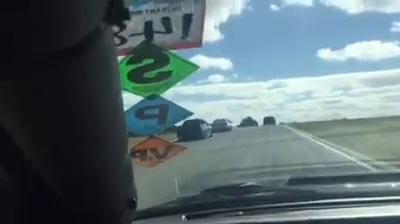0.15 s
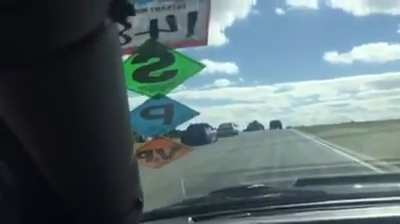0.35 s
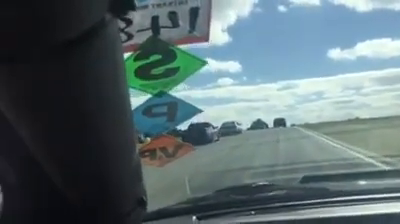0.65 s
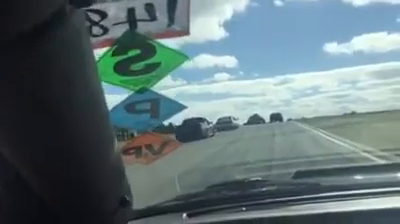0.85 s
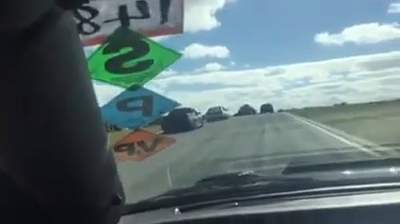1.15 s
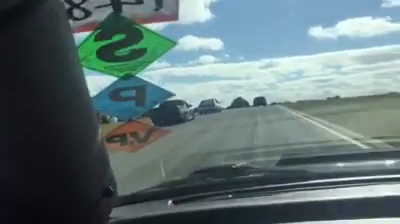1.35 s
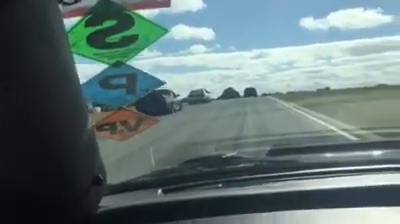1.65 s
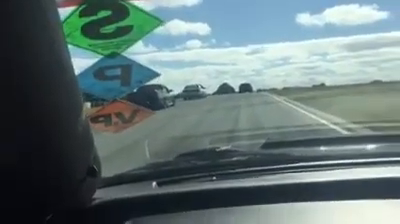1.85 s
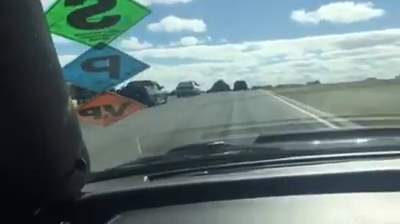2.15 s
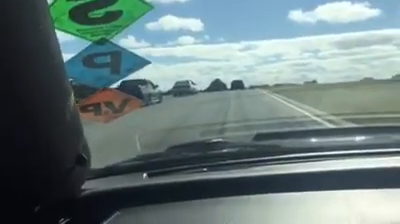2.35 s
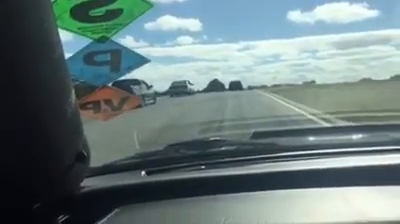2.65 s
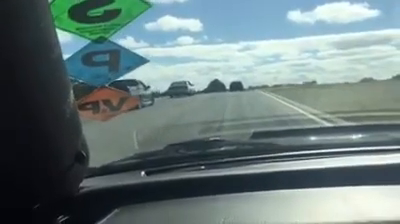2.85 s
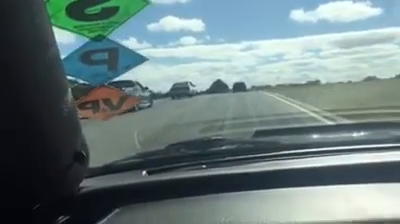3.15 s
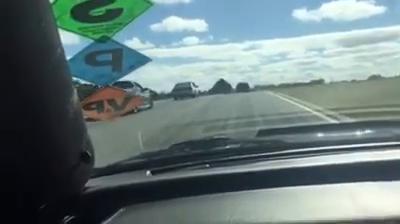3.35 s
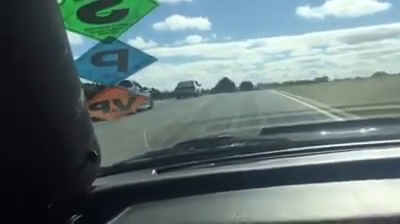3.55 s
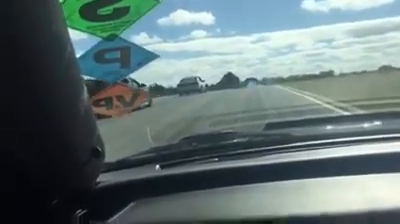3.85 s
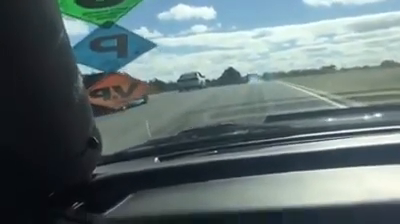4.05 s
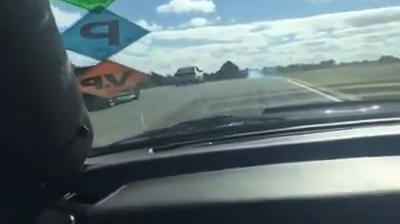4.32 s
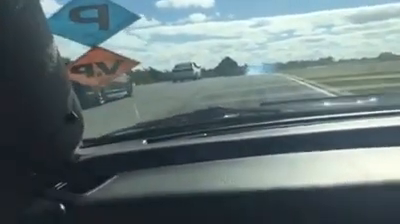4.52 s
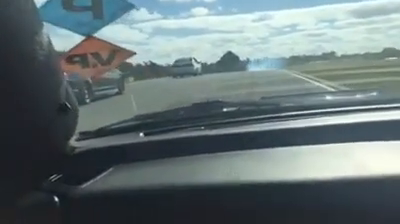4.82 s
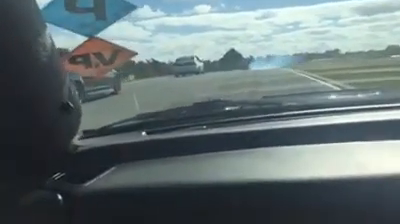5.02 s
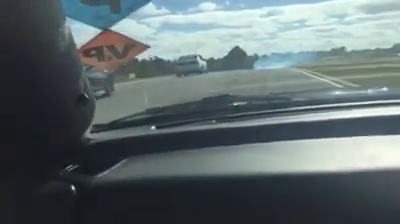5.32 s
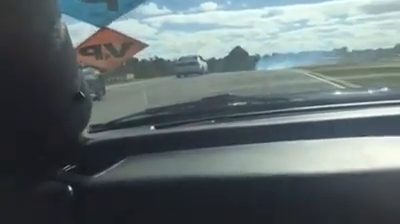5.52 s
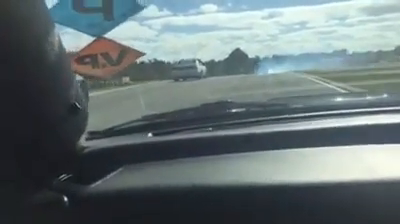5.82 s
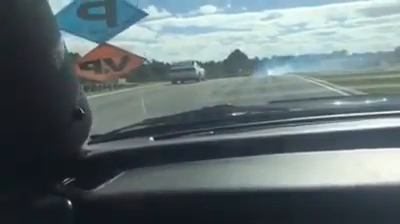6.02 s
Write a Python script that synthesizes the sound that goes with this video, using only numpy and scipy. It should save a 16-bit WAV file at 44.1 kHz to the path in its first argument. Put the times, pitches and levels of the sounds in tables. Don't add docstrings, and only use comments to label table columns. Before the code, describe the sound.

Heard from a phone inside a car at speed on a racing circuit: a loud, deep, uneven rotary engine drone, its revs creeping up slightly, over low tyre rumble and throbbing cabin air noise. Roar and tyre hiss of cars ahead come through the window and fade. Thin gear whines pass early; two small misfires hiccup around three and four seconds as a rival revs up and then lifts off.

```python
import sys
import numpy as np
from scipy import signal
from scipy.fft import rfft, irfft, next_fast_len
from scipy.io import wavfile
from scipy.ndimage import uniform_filter1d

SR = 44100
rng = np.random.default_rng(int(sys.argv[2]) if len(sys.argv) > 2 else 0)


def transcribe(u):
    v = np.clip(np.atleast_2d(u).T, -1, 1)
    q = np.round(v * 32767).astype(np.int16)
    wavfile.write(sys.argv[1], SR, q)


def nominal_scale(level):
    x = np.asarray(level, float) / 20
    return 10 ** x


N = 272348
T = np.arange(N) / SR
SIZE = next_fast_len(N + SR // 4)
HZ = np.maximum(np.arange(SIZE // 2 + 1) * SR / SIZE, 1)
RIVAL_LIFT_S = 4.52


def level(x, db):
    return x * nominal_scale(db) / np.sqrt(np.mean(x ** 2))


def curves(table):
    s, *columns = np.transpose(table)
    return [np.interp(T, s, c) for c in columns]


def gain(spectrum):
    hz, db = np.transpose(spectrum)
    return nominal_scale(np.interp(np.log(HZ), np.log(hz), db))


def walk(rate):
    hold = int(SR / rate)
    steps = np.repeat(rng.standard_normal(N // hold + 1), hold)
    return 1.3 * uniform_filter1d(uniform_filter1d(steps, hold), hold)[:N]


def noise_through(response):
    return irfft(rfft(rng.standard_normal(SIZE)) * response, SIZE)[:N]


def rush(spectrum, gust_db, flicker_db, count):
    white = rfft(rng.standard_normal(SIZE)) * gain(spectrum)
    gust = walk(count)
    out = 0
    for octave in range(4, 15):
        band = np.cos(np.pi / 2 * np.clip(np.log2(HZ) - octave, -1, 1)) ** 2
        swell = nominal_scale(gust_db * gust + flicker_db * walk(2 * count))
        out = out + irfft(white * band, SIZE)[:N] * swell
    return level(out, 0)


def tone(start, stop, hz, db, orders, wobble, flutter_db, fade_s):
    phase = 2 * np.pi * np.cumsum(hz * (1 + wobble * walk(25))) / SR
    fade = np.clip(np.minimum(T - start, stop - T) / fade_s, 0, 1)
    waves = sum(nominal_scale(db + d + flutter_db * walk(12)) * np.sin(k * phase) for k, d in orders)
    return np.sqrt(2) * fade * waves


# time in seconds, engine cycles a second in Hz.
ENGINE_SPEED = [(0.0, 34.49), (0.45, 34.71), (1.25, 35.03), (1.65, 35.42), (2.1, 35.67), (2.45, 35.69),
                (2.9, 36.02), (3.7, 36.02), (4.2, 36.11), (4.65, 36.14), (5.2, 36.44), (6.18, 36.72)]
# time in seconds, share of the usual pulse, cycles the shaft loses.
MISFIRES = [
    (2.9755, .6, .04),
    (3.8095, .45, .038),
]
STRONG_S = [.055, 2.9755, 3.8095, 6.149]


def shaft():
    hz, = curves(ENGINE_SPEED)
    turns = np.cumsum(hz) / SR + .004 * walk(10)
    for miss_s, _, lost in MISFIRES:
        turns = turns - lost * np.clip((T - miss_s) / .009, 0, 1)
    strong = np.interp(STRONG_S, T, turns)
    turns = turns - np.interp(T, STRONG_S, strong - np.round(strong))
    return hz, turns


# size in dB, lateness in cycles.
FIRINGS = [(0, 0), (-5.75, .001), (-2, -.009)]


def firings(hz, turns):
    before_miss, after_miss = .85, 1.3
    early_s, suck_s, suck = .0028, .0078, -.7
    k = np.arange(-6, int(3 * turns[-1]))
    face_db, late = np.transpose(FIRINGS)[:, k % 3]
    chance = rng.standard_normal((len(k), 2)).T
    due = k / 3 + late + .003 * chance[0]
    before_start_s = np.minimum(due - turns[0], 0) / hz[0]
    at = SR * (np.interp(due, turns, T) + before_start_s)
    size = nominal_scale(face_db + .7 * chance[1])
    miss_s, share, _ = np.transpose(MISFIRES)
    missed = np.searchsorted(k, 3 * np.round(np.interp(miss_s, T, turns)))
    size[missed] *= share
    size[missed - 1] *= before_miss
    size[missed + 1] *= after_miss
    at[missed] -= early_s * SR
    at = np.append(at, at[missed] + suck_s * SR)
    size = np.append(size, suck + 0 * share)
    whole = np.floor(at).astype(int)
    first = np.bincount(whole % SIZE, size * (1 - at + whole), SIZE)
    second = np.bincount((whole + 1) % SIZE, size * (at - whole), SIZE)
    return -first - second


# three numbers of a parabola over octaves from 107 Hz, in radians.
BEND_RAD = (2.65, .8, 3.17)


def through_pipe(x, spectrum):
    octaves = np.clip(np.log2(HZ / 107), -1, 2)
    phase = np.polyval(BEND_RAD, octaves) - 2 * np.pi * HZ * .0091
    return irfft(rfft(x, SIZE) * gain(spectrum) * np.exp(1j * phase), SIZE)[:N]


# multiple of the cycle rate, level in dB, dB per Hz of revs.
RASP = [(12, -60, 0), (14, -64, 0), (15, -63, 0), (17, -61, -4), (18, -55.5, 0), (21, -61, -3)]


def rasp(turns, extra_hz):
    out = 0
    for n, db, slope in RASP:
        loudness = nominal_scale(db + slope * extra_hz + 2.2 * walk(5))
        out = out + loudness * np.sin(2 * np.pi * n * turns + .7 * walk(10))
    return np.sqrt(2) * out


# frequency in Hz, gain in dB.
BODY = [(25, -34.5), (45, -14.5), (71, -1.5), (107, 1.5), (143, 0), (179, 0.5), (214, -8.5), (250, -19.5),
        (286, -22.5), (322, -20.5), (380, -31.5), (500, -56), (1000, -81.5)]


def engine(hz, turns):
    cruise_hz, bark_hz = 36.97, 35.81
    pulses = firings(hz, turns)
    boom = level(through_pipe(pulses, BODY), 0)
    bark = through_pipe(pulses, [(190, -57.5), (205, -10.5), (222, -10.0), (240, -63)])
    bark_change = nominal_scale(-1 * (hz - bark_hz)) - 1
    extra_hz = hz - cruise_hz
    boom_db = -16.5 - 0.38 * extra_hz + 0.6 * walk(12)
    return nominal_scale(boom_db) * (boom + bark_change * level(bark, -14.0)) + rasp(turns, extra_hz)


# frequency in Hz, level in dB per Hz.
ROAD = [(25, -8.5), (45, 0.5), (70, 7), (125, 9.5), (160, 1), (250, -3.5), (340, -4), (400, -69)]


def road():
    return rush(ROAD, gust_db=1.0, flicker_db=2.46, count=6) * nominal_scale(-30)


# frequency in Hz, level in dB per Hz.
CABIN = [(300, -35.5), (430, -6.5), (550, -8.5), (670, -6.5), (920, -11), (1200, -18), (1820, -16),
         (3300, -25.5), (3800, -29), (4550, -27.5), (5600, -34), (8000, -38.5), (11000, -55.5),
         (15000, -64.5)]


def cabin(turns):
    throb = 1 + 0.091 * np.cos(6 * np.pi * turns) + 0.08 * np.cos(4 * np.pi * turns)
    return throb * rush(CABIN, gust_db=.3, flicker_db=.6, count=4) * nominal_scale(-46)


# time in seconds, distance in m.
GAP = [(0, 8.9), (.75, 12.4), (2.7, 21.8), (3.75, 32), (4.5, 50), (5.3, 69), (6.18, 32)]


def distance_db():
    return -20 * np.log10(curves(GAP)[0])


# frequency in Hz, level in dB per Hz.
ROAR = [(200, -9.5), (400, 4), (600, -5.5), (900, -0.5), (1400, -2.5), (2200, -10.5), (3500, -16),
        (6000, -21.5), (9000, -40)]


def roar():
    lift_db = -5.5 * np.clip((T - RIVAL_LIFT_S) / .15 + 1, 0, 1)
    db = -27 + .65 * distance_db() + lift_db
    return rush(ROAR, gust_db=-0.7, flicker_db=0.93, count=12) * nominal_scale(db)


# frequency in Hz, level in dB per Hz.
HISS = [(3000, -8.5), (6000, -1), (7500, -3), (9500, -2), (11200, -4), (13000, -4), (15300, -16.5)]


def hiss():
    return rush(HISS, gust_db=1.3, flicker_db=.8, count=40) * nominal_scale(-37.5 + distance_db())


# middle in seconds, half length in seconds, pitch in Hz, width in Hz, level in dB.
SURGES = [
    (0.06, 0.15, 290, 90, -40),
    (0.112, 0.3, 890, 118.8, -48.5),
    (3.096, .06, 990, 101, -50),
    (3.26, 0.42, 1344, 200, -48.5),
    (4.15, 0.25, 1480, 600, -51),
    (3.95, 0.33, 3200, 1500, -58.5),
    (4.598, 0.18, 920, 297, -49.5),
    (5.3, .8, 4310, 350, -68),
    (5.507, 0.24, 904, 150, -54),
]


def surges():
    out = 0
    for s, half, hz, width, db in SURGES:
        band = noise_through(np.exp(-2 * ((HZ - hz) / width) ** 2))
        out = out + level(band, db) * np.exp(-((T - s) / half) ** 2)
    return out


# start in seconds, end in seconds, first Hz, last
# Hz, level in dB.
THIN_TONES = [
    (.92, 1.95, 1403, 1407, -51.5),
    (1.88, 2.3, 1402, 1374, -53),
    (1.56, 1.97, 1530, 1580, -46.5),
    (3.1, 3.4, 670, 760, -50),
    (3.15, 3.45, 1040, 1130, -54),
]


def thin_tones():
    out = 0
    for start, stop, hz, end_hz, db in THIN_TONES:
        glide = np.interp(T, [start, stop], [hz, end_hz])
        out = out + tone(start, stop, glide, db, [(1, 0)], wobble=.0006, flutter_db=1.2, fade_s=.15)
    return out


# multiple of its pitch, level in dB.
RIVAL_ORDERS = [(1, 0), (2, -20), (3, -24)]


def rival():
    start_s, peak_s, pull_s = 2.82, 3.97, .13
    near_db, far_db = -33, -48.5
    climb = 186 * np.clip(peak_s - T, 0, 1.3) ** 1.4
    sag = 12 * np.maximum(T - peak_s, 0)
    hz = 464 - climb - sag
    db = far_db + (near_db - far_db) * np.exp(-((T - start_s) / (2 * pull_s)) ** 2)
    db = db + 2.5 * np.exp(-((hz - 455) / 30) ** 2)
    return tone(start_s, RIVAL_LIFT_S, hz, db, RIVAL_ORDERS, wobble=.003, flutter_db=2.8, fade_s=.06)


def scene():
    hz, turns = shaft()
    inside = engine(hz, turns) + road() + cabin(turns)
    outside = roar() + hiss() + surges() + thin_tones() + rival()
    return (inside + outside)[None]


def low_pass(x):
    return signal.sosfilt(signal.butter(12, 15300, fs=SR, output="sos"), x)


# frequency in Hz, width in Hz, depth in dB.
MIC_DIPS = [(4930, 240, -5), (10400, 260, -3.5)]


def record(dry):
    dips = nominal_scale(sum(db * np.exp(-((HZ - hz) / width) ** 2) for hz, width, db in MIC_DIPS))
    noisy = dry + nominal_scale(-67) * rng.standard_normal(N)
    heard = irfft(rfft(noisy, SIZE) * dips, SIZE)[:, :N]
    return low_pass(heard)


dry = scene()
out = record(dry)
transcribe(out)
```